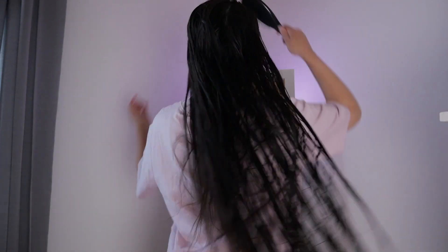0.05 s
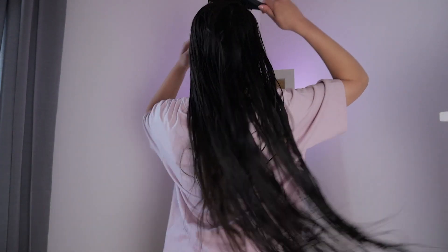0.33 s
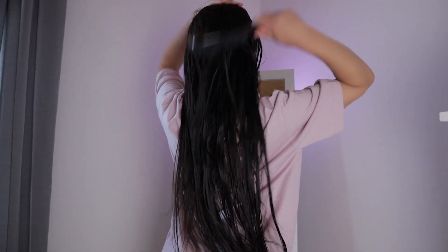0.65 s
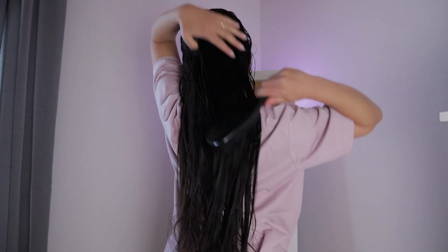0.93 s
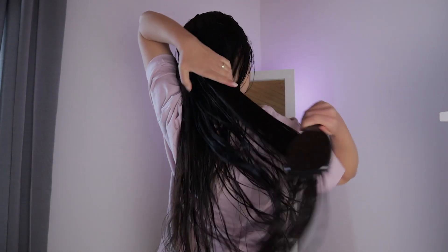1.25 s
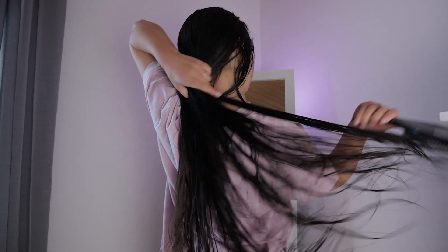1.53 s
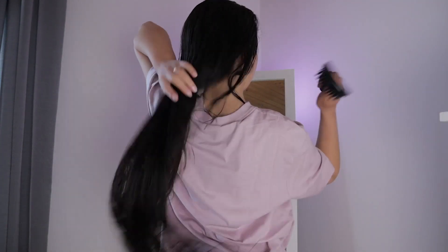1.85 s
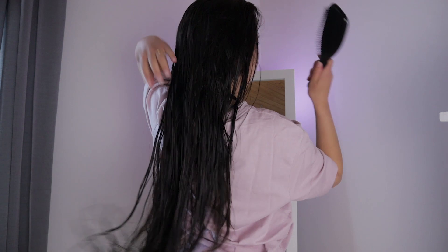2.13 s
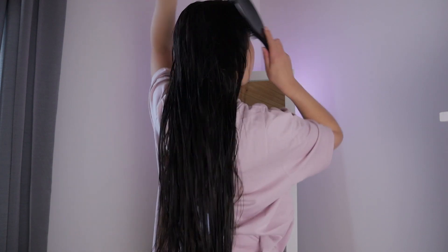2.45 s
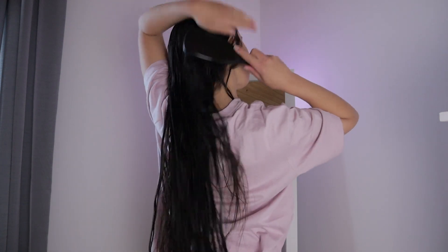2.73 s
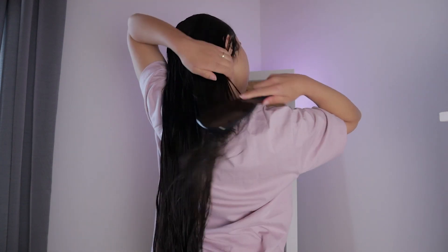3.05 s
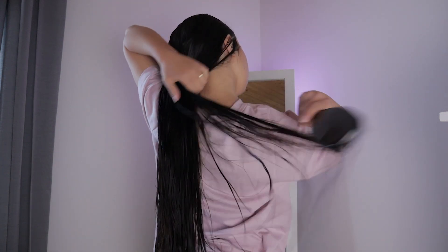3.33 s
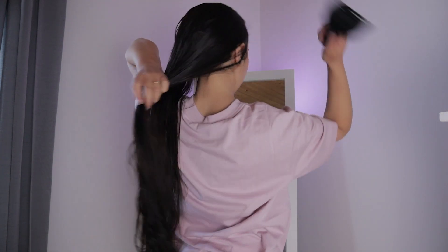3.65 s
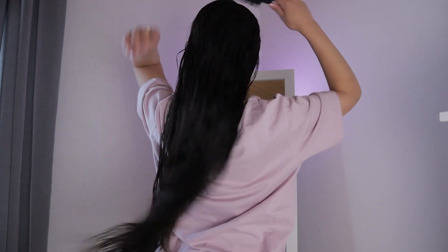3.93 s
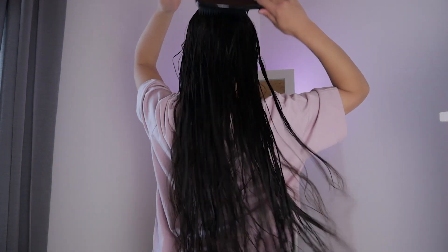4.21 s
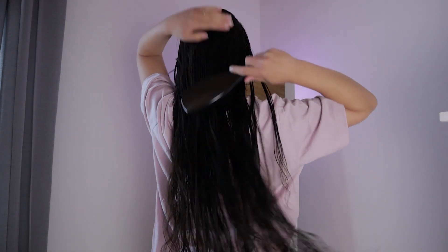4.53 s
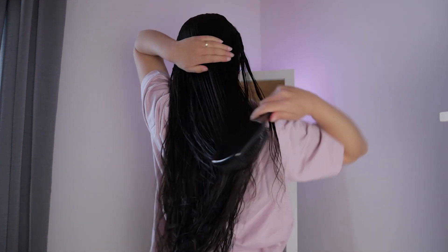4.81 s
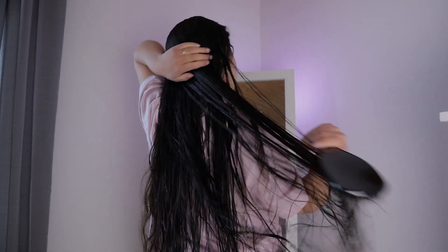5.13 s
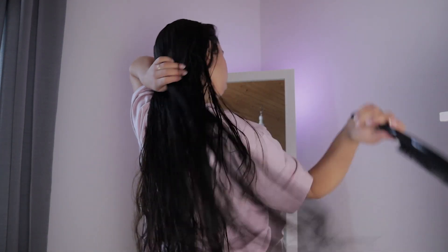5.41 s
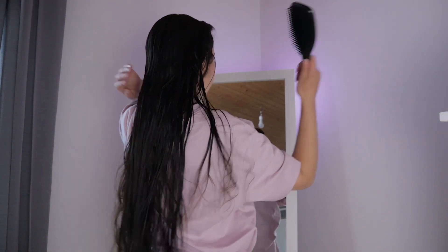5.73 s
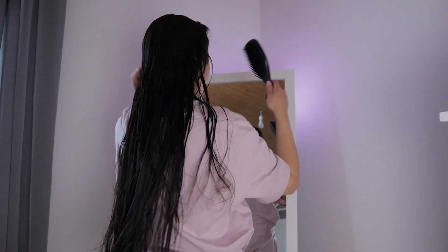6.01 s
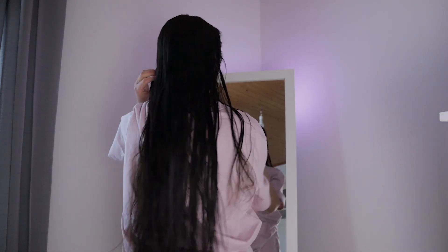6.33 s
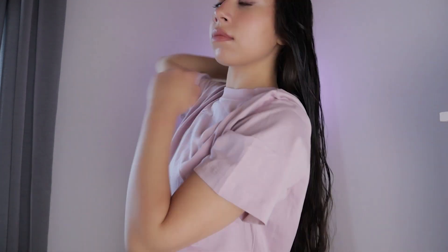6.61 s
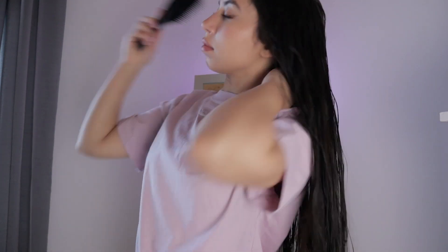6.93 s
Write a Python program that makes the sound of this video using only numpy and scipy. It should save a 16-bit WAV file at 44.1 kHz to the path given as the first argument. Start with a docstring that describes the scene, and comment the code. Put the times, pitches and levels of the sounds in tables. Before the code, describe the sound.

Long wet hair is brushed in three strokes in a quiet, bare room, heard in wide stereo. After a soft rustle, each stroke scrapes the scalp, then hisses down the lengths with a faint squeak as bristles pluck the hollow paddle. The first ends in a sharp smack as the wet ends whip free. Light ticks fall around the other two, followed by a dull knock and a last rustle.

```python
"""Long wet hair is brushed in three strokes in a quiet, bare room, before a wide stereo microphone.
After a rustle, each stroke scrapes the scalp, then hisses down the lengths with a faint squeak
while bristles pluck the hollow paddle. The first ends in a sharp smack as the wet ends whip free.
Light ticks fall around the next two strokes; a dull handling knock and a last rustle follow."""
import sys
import numpy as np
from scipy import signal
from scipy.fft import rfft, irfft, next_fast_len
from scipy.io import wavfile
from scipy.ndimage import uniform_filter1d

SR = 44100
rng = np.random.default_rng(int(sys.argv[2]) if len(sys.argv) > 2 else 0)


def to_wav(s):
    """Save 16-bit WAV."""
    ch = np.atleast_2d(s).T  # columns
    pcm = np.round(np.clip(ch, -1, 1) * 32767)  # PCM
    wavfile.write(sys.argv[1], SR, pcm.astype(np.int16))


N = 307377

# hiss of sliding hair: freq_hz, density_db
HISS_SPECTRUM = [(500, -34), (1500, 1.5), (3500, -1.5), (6000, 0), (9000, -3.5), (11600, 0.5), (13000, -8),
                 (15500, -21)]
# pulls down the lengths: start_s, length_s, speed_db, tips_db
PULLS = [(0.724, 0.876, 0, -55), (2.78, .67, 1, -61), (4.473, 0.85, -1.1, -60)]
# stereo width near the head: freq_hz, side_to_mid_db
NEAR_WIDTH = [(100, -45), (550, -13.5), (1200, -5.5), (2400, -1.5), (4400, -0.5), (14000, 1)]
# stereo width of the room echo: freq_hz, side_to_mid_db
ECHO_WIDTH = [(150, -36), (450, -10), (800, -5), (1300, 1), (2500, 3), (5000, 8.5), (12000, 9)]


def gain_of(db):
    """Decibels to amplitude."""
    return 10 ** (np.asarray(db) / 20)


def curve_at(points, hz):
    """Table interpolated over log frequency."""
    freq_hz, value = np.transpose(points)
    return np.interp(np.log(hz + 1), np.log(freq_hz + 1), value)


def colour(x, spectrum):
    """Minimum-phase filter with the given dB spectrum."""
    size = next_fast_len(x.shape[-1] + 8192)
    hz = abs(np.fft.fftfreq(size, 1 / SR))
    log_gain = np.log(gain_of(np.maximum(curve_at(spectrum, hz), -100)))
    response = np.exp(np.conj(signal.hilbert(log_gain)))[:size // 2 + 1]
    return irfft(rfft(x, size) * response, size)[..., :x.shape[-1]]


def spread(pair, width):
    """Two unrelated signals, as mid and side, to left and right."""
    side = colour(pair[1], width)
    return np.array([pair[0] + side, pair[0] - side])


def unit_rms(pair, band_hz):
    """Scales the mid signal to rms 1 within a band."""
    bandpass = signal.butter(3, band_hz, "band", fs=SR, output="sos")
    return pair / signal.sosfilt(bandpass, pair.mean(0)).std()


def wavering(samples):
    """Smoothed random drift of rms 1."""
    drift = uniform_filter1d(rng.standard_normal(N), size=samples)
    return drift / drift.std()


def envelope(start_s, length_s, attack_s, release_s, swell_db=0):
    """Gain of one gesture: rise, hold with swell or sag, decay."""
    t = np.arange(0, length_s + 10 * release_s, 1 / SR)
    hold = gain_of(swell_db * (np.minimum(t / length_s, 1) - .5))
    shape = np.minimum(t / attack_s, 1) * hold * np.exp(-np.maximum(t - length_s, 0) / release_s)
    return np.pad(shape, (max(round(start_s * SR), 0), N))[:N]


def ring(modes):
    """Struck modes as decaying sines."""
    t = np.arange(SR // 2) / SR
    return sum(gain_of(db - 60 * t / t60_s) * np.sin(2 * np.pi * hz * t) for hz, db, t60_s in modes)


def impulses(times_s, levels_db):
    """Train of single-sample blows."""
    train = np.zeros(N)
    np.add.at(train, np.round(np.asarray(times_s) * SR).astype(int), gain_of(levels_db))
    return train


def convolve(x, response):
    """Per-channel convolution, cut to the scene length."""
    return signal.fftconvolve(np.atleast_2d(x), np.atleast_2d(response), axes=1)[:, :N]


def snaps(times_s, levels_db, spectrum, decay_s):
    """Tiny noise bursts in a shared colour."""
    t = np.arange(SR // 20) / SR
    level = convolve(impulses(times_s, levels_db), np.exp(-t / decay_s))
    return spread(colour(level * rng.standard_normal((2, N)), spectrum), NEAR_WIDTH)


def grains(rate_hz, spread_db):
    """Two random trains of tiny slips, a few larger than the rest."""
    size = gain_of(spread_db * np.minimum(rng.exponential(1, (2, N)), 4))
    train = size * rng.choice([-1, 1], (2, N)) * (rng.random((2, N)) < rate_hz / SR)
    return train / train.std()


def room(hold_s, t60_scale, width):
    """Reflections: level while the bare walls pass them around, then dying band by band."""
    # room decay: freq_hz, base_t60_s
    decay = [(150, 0.69), (500, 0.45), (1500, 0.63), (3000, 0.5), (7000, 0.47), (12000, 0.51)]
    hz, t, bands = signal.stft(rng.standard_normal((2, SR)), SR, nperseg=256)
    t60_s = t60_scale * curve_at(decay, hz)[:, None]
    bands = bands * gain_of(-60 * np.maximum(t - hold_s, 0) / t60_s)
    onset = np.clip(np.arange(SR) / SR / 0.00067 - 1, 0, 1)
    tail = signal.istft(bands, SR, nperseg=256)[1][:, :SR] * onset
    return spread(tail / np.linalg.norm(tail[0]), width)


def background():
    """Diffuse room hush and a slowly swelling mono rumble."""
    # room hush: freq_hz, density_db
    hush_spectrum = [(41, -44.5), (70, -0.5), (176, -7.5), (197, -8), (269, -8.5), (395, -10), (472, -11.5),
                     (847, -15), (1160, -18), (1620, -19), (2170, -23.5), (2380, -21.5), (3260, -24.5),
                     (13100, -40), (15000, -80)]
    # its stereo width: freq_hz, side_to_mid_db
    hush_width = [(60, -25), (110, -6), (200, 3), (380, 3.5), (700, 5.5), (1400, 6), (3000, 5),
                  (14000, 6.5)]
    # low rumble: freq_hz, density_db
    rumble_spectrum = [(15, -32.5), (30, -19), (38, 3), (44, 5), (52, -3), (70, -21), (100, -15),
                       (130, -26.5), (180, -19.5), (300, -28.5), (800, -63)]
    # its swell: time_s, level_db
    rumble_levels = [(0, -32.5), (0.11, -41), (0.19, -49), (0.3, -37.5), (0.9, -45.5), (1.44, -40.5),
                     (1.55, -46.5), (2.21, -49), (2.33, -44.5), (3.3, -54.5), (3.8, -47.5), (4.1, -53.5),
                     (4.5, -48), (5.25, -52), (6.15, -54), (6.28, -42), (6.7, -62.5), (6.9, -51)]
    hush = spread(colour(rng.standard_normal((2, N)), hush_spectrum), hush_width)
    hush = unit_rms(hush, band_hz=(200, 8000))
    lead_in = 8192
    rumble = colour(rng.standard_normal((1, N + lead_in)), rumble_spectrum)[:, lead_in:]
    rumble = unit_rms(rumble, band_hz=(25, 65))
    rumble = rumble / np.sqrt(uniform_filter1d(rumble ** 2, size=4000) + 0.086)  # steadies the level
    swell_db = np.interp(np.arange(N) / SR, *np.transpose(rumble_levels)) + 1.3 * wavering(samples=5000)
    return gain_of(-56.5) * hush + gain_of(swell_db + 0.4) * rumble


def brushing():
    """Drive of all gestures under a wavering grip. Triples and result: hiss, scrape, paddle."""
    # loose hair and sleeves as the arms move: start_s, length_s, level_db
    rustles = [(0.065, 0.22, -3.5), (3.497, 0.32, -7), (5.73, .05, 4), (5.844, 0.056, 2.5),
               (6.83, 0.087, 2)]
    # brush on the scalp: start_s, attack_s, length_s, force_db, bright_db, hollow_db
    presses = [(0.35, 0.041, 0.081, -11, -0.5, -3), (0.441, 0.038, .26, 0.5, -.5, -3.5),
               (2.527, 0.018, 0.17, -9, -2, 0), (2.717, 0.044, 0.044, 0, -2.5, -4),
               (2.775, 0.049, 0.14, -10.5, -2, 9.5), (4.102, 0.018, 0.044, -12, -2, -3),
               (4.169, 0.08, 0.14, -7, 2, -0.5), (4.362, 0.042, 0.11, -0.5, -2.5, 1)]
    # brush in tangles: start_s, length_s, drag_db
    tangles = [(1.399, 0.079, 2), (3.15, 0.12, -9.5), (4.672, 0.12, -9.5), (5.073, .1, -14)]
    rustle_db, press_db, tangle_db = (-67.5, -63, -72), (-50, -45.5, -38.5), (-60, -46, -51)
    pull_db, pull_swell_db = (-59, -59, -54.5), (-4, 1.5, -6.5)  # halfway down; change from nape to tips
    drives = []
    for start_s, length_s, level_db in rustles:
        shape = envelope(start_s, length_s, attack_s=0.054, release_s=0.084)
        drives.append([gain_of(db + level_db) * shape for db in rustle_db])
    for start_s, attack_s, length_s, force_db, bright_db, hollow_db in presses:
        shape = envelope(start_s, length_s, attack_s, release_s=0.062, swell_db=2)
        tinted_db = np.add(press_db, (bright_db, 0, hollow_db))
        drives.append([gain_of(db + force_db) * shape for db in tinted_db])
    for start_s, length_s, speed_db, _ in PULLS:
        shapes = [envelope(start_s, length_s, attack_s=0.12, release_s=0.1, swell_db=db)
                  for db in pull_swell_db]
        drives.append([gain_of(db + speed_db) * shape for db, shape in zip(pull_db, shapes)])
    for start_s, length_s, drag_db in tangles:
        shape = envelope(start_s, length_s, attack_s=0.076, release_s=0.055)
        drives.append([gain_of(db + drag_db) * shape for db in tangle_db])
    grip = gain_of(0.97 * wavering(samples=2000))
    return [grip * np.sqrt(sum(gain ** 2 for gain in layer)) for layer in zip(*drives)]


def friction(spectrum, band_hz, rate_hz, spread_db, wash):
    """Strands slip over bristles: separate grains in a smooth wash."""
    drive = grains(rate_hz, spread_db) + wash * rng.standard_normal((2, N))
    return unit_rms(spread(colour(drive, spectrum), NEAR_WIDTH), band_hz)


def strands(sliding, scraping):
    """Hiss of the wet lengths; coarser scrape where the brush presses in."""
    # scalp scrape: freq_hz, density_db
    scrape_spectrum = [(200, -21), (400, 8), (660, 7.5), (820, 5.5), (1000, 9), (1300, -2), (2000, 1),
                       (2800, -4.5), (4200, -11), (7000, -15), (12000, -51)]
    hiss = friction(HISS_SPECTRUM, band_hz=(7000, 14000), rate_hz=2500, spread_db=6.5, wash=2.7)
    scrape = friction(scrape_spectrum, band_hz=(1300, 4000), rate_hz=600, spread_db=3, wash=1)
    return gain_of(-2) * (hiss * sliding + scrape * scraping)


def paddle(drumming):
    """Bristles flick the hollow paddle: a patter, and hard plucks that start with a snap."""
    # paddle modes: pitch_hz, level_db, t60_s
    modes = [(451.2, -12.5, 0.23), (555.5, -2.5, 0.087), (618, -6.5, 0.12), (674, -7.5, 0.083),
             (940, -15.5, 0.15), (1600, -12, 0.034), (2470, -23.5, 0.021)]
    # bristles that catch and snap back: start_s, ring_db, snap_db
    catches = [(.466, -54, -28), (1.363, -36, -30), (1.392, -38, -31.5), (1.415, -37, -36),
               (1.432, -46, -32), (1.449, -41, -26), (1.466, -42, -30), (1.478, -35, -44),
               (2.713, -30, -34), (2.739, -26, -43), (2.755, -47, -28.5), (2.798, -38, -36),
               (2.817, -39, -28), (2.832, -37, -44), (2.884, -36, -33), (2.908, -34, -56),
               (4.292, -33, -37), (4.419, -35, -33), (4.449, -34.5, -34), (4.465, -28.5, -45),
               (5.099, -35.5, -31.5), (5.141, -32, -35), (5.340, -36.5, -53), (5.360, -37.5, -43),
               (5.385, -40, -41)]
    # bristle snap: freq_hz, density_db
    snap_spectrum = [(300, 4), (1000, 5.5), (2300, 5.5), (4000, -5.5), (6500, -5), (9000, -12),
                     (14000, -31)]
    body = ring(modes)
    patter = spread(convolve(grains(rate_hz=300, spread_db=1.5), body), NEAR_WIDTH)
    patter = gain_of(-6.5) * drumming * unit_rms(patter, band_hz=(420, 800))
    start_s, ring_db, snap_db = np.transpose(catches)
    plucks = convolve(impulses(start_s, ring_db - 7), body)
    plucks = plucks + snaps(start_s, snap_db - 3, snap_spectrum, decay_s=0.0014)
    echo = convolve(plucks, room(hold_s=0.0089, t60_scale=0.96, width=NEAR_WIDTH))
    return patter + plucks + gain_of(-4) * echo


def tips():
    """The tips slip out of the brush as each pull ends: a thin, wide hiss."""
    # tips fanning out: freq_hz, side_to_mid_db
    width = [(1000, 6), (4000, 23), (14000, 23)]
    slip_s = 0.24
    level = sum(gain_of(db) * envelope(start_s + length_s - slip_s, slip_s, attack_s=0.078,
                                       release_s=0.024) for start_s, length_s, _, db in PULLS)
    hiss = spread(colour(rng.standard_normal((2, N)), HISS_SPECTRUM), width)
    return gain_of(2) * level * hiss / hiss.std()


def squeaks():
    """Wet strands stick and slip on the brush: a weak, unsteady hum that glides as it fades."""
    # rubs: start_s, length_s, from_hz, to_hz, level_db
    rubs = [(1.464, 0.24, 558, 574, -50), (2.788, .07, 552, 595, -42), (5.196, 0.079, 525, 440, -50)]
    t, hum = np.arange(N) / SR, np.zeros(N)
    jitter = 1 + 0.0179 * wavering(samples=400)
    shimmer = gain_of(2.2 * wavering(samples=400))
    for start_s, length_s, from_hz, to_hz, level_db in rubs:
        pitch_hz = np.interp(t, [start_s, start_s + length_s], [from_hz, to_hz]) * jitter
        phase = 2 * np.pi * np.cumsum(pitch_hz) / SR
        shape = envelope(start_s, length_s, attack_s=0.011, release_s=0.01, swell_db=-11)
        hum += gain_of(level_db) * shape * shimmer * (np.sin(phase) + gain_of(-33) * np.sin(2 * phase))
    return hum + gain_of(2.5) * convolve(hum, room(hold_s=0.01, t60_scale=0.51, width=NEAR_WIDTH))


def smack():
    """The wet ends whip free: a crack on the right, answered by the whole room."""
    # brief ring of the crack: pitch_hz, level_db, t60_s
    crack_modes = [(697, -5.5, 0.048), (1720, -2, 0.011), (2720, 8, 0.0046), (4520, -3.5, 0.0064),
                   (7870, -2.5, 0.0022), (11340, -7, 0.008)]
    # room return: freq_hz, density_db
    echo_spectrum = [(110, -51), (200, -18), (270, -11), (400, -1), (520, -1), (700, -5), (950, -3),
                     (1250, -10.5), (1600, -8.5), (2600, -15.5), (3900, -27), (8000, -38.5), (12000, -56),
                     (15000, -74)]
    # standing waves: pitch_hz, level_db, t60_s
    room_modes = [(280, -29.5, 0.61), (409, -28.5, 0.57), (512, -17.5, 0.41), (659, -31.5, 0.56),
                  (857, -30.5, 0.65), (903, -39, 0.48)]
    blow = impulses(times_s=[1.6984], levels_db=[0])
    highpass = signal.butter(2, 380, "high", fs=SR, output="sos")  # the crack carries no low thump
    crack = signal.sosfilt(highpass, convolve(blow, ring(crack_modes))[0])
    direct = np.array([gain_of(-9) * np.roll(crack, 6), gain_of(0.5) * crack])  # arrives later on the left
    echo = colour(convolve(blow, room(hold_s=0.081, t60_scale=0.89, width=ECHO_WIDTH)), echo_spectrum)
    standing = ring(room_modes)
    build_up = 1 - np.exp(-np.arange(len(standing)) / SR / 0.035)
    return direct + gain_of(32) * echo + gain_of(3) * convolve(blow, standing * build_up)


def ticks():
    """Light, bright handling ticks with a little room."""
    # touches: start_s, level_db
    touches = [(1.941, -45), (3.557, -40.5), (3.648, -44.5), (4.114, -44), (5.743, -43), (5.776, -34)]
    # tick: freq_hz, density_db
    spectrum = [(400, -5), (1500, 4), (4300, 3), (7500, -7), (11500, 0.5), (15000, -26)]
    tick = gain_of(-4) * snaps(*np.transpose(touches), spectrum, decay_s=0.0016)
    return tick + gain_of(-1.5) * convolve(tick, room(hold_s=0.0068, t60_scale=0.46, width=NEAR_WIDTH))


def knock():
    """A dull knock with a woody ring, clacking rebounds and a brief bloom in the room."""
    # knock and rebounds: start_s, thud_db, clack_db
    hits = [(6.2018, 0.5, -31.5), (6.2075, -2.5, -43), (6.2105, -2.5, -26.5), (6.246, -6.5, -28),
            (6.2534, -18, -30)]
    # thud: freq_hz, density_db
    thud_spectrum = [(35, -9), (70, 3), (100, 6), (170, 3), (270, 4), (450, -3), (740, -1), (1250, -15.5),
                     (2400, -24), (3600, -25), (7000, -39.5), (12000, -39), (15000, -71)]
    # modes of the knocked object: pitch_hz, level_db, t60_s
    modes = [(493, -52, 0.03), (764, -26, 0.037), (950, -40, 0.017), (1380, -49, 0.031)]
    # hard clack: freq_hz, density_db
    clack_spectrum = [(500, -15), (1300, 12.5), (2400, 0), (3600, 1), (6000, -13), (11500, -24),
                      (15000, -39)]
    start_s, thud_db, clack_db = np.transpose(hits)
    blows = impulses(start_s, thud_db)
    thud = colour(blows, thud_spectrum)
    wood = convolve(blows, ring(modes))
    clack = gain_of(-5) * snaps(start_s, clack_db, clack_spectrum, decay_s=0.0021)
    send = gain_of(11.5) * thud + gain_of(-10) * clack
    bloom = convolve(send, room(hold_s=0.022, t60_scale=0.67, width=ECHO_WIDTH))
    return gain_of(1) * thud + wood + clack + bloom


def scene():
    """Stereo sum of all sources."""
    sliding, scraping, drumming = brushing()
    strokes = strands(sliding, scraping) + paddle(drumming) + tips() + squeaks()
    return strokes + ticks() + smack() + knock() + background()


def record(dry):
    """Clips at full scale and limits the band."""
    cutoff_hz = 15600
    lowpass = signal.firwin(511, cutoff_hz, window=("kaiser", 9), fs=SR)
    return signal.oaconvolve(np.clip(dry, -1, 1), lowpass[None], "same")


dry = scene()
out = record(dry)
to_wav(out)
```